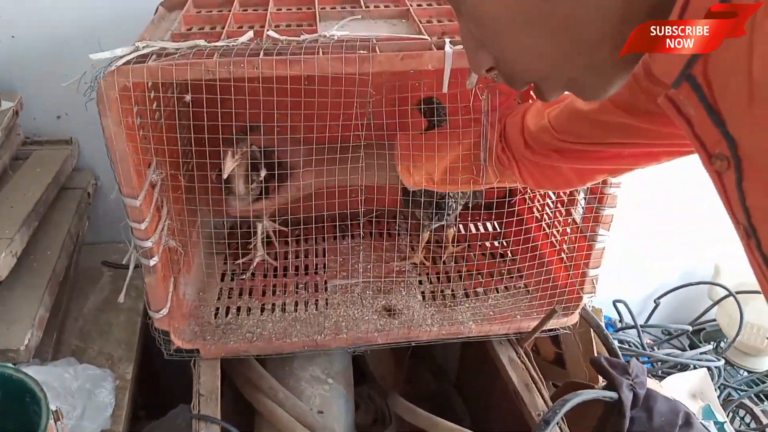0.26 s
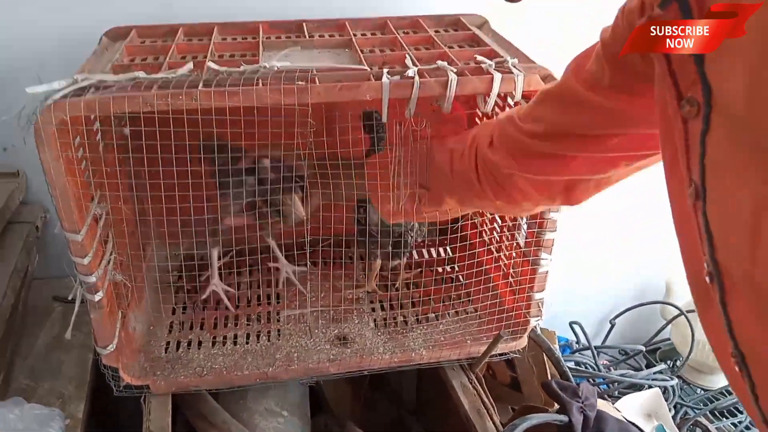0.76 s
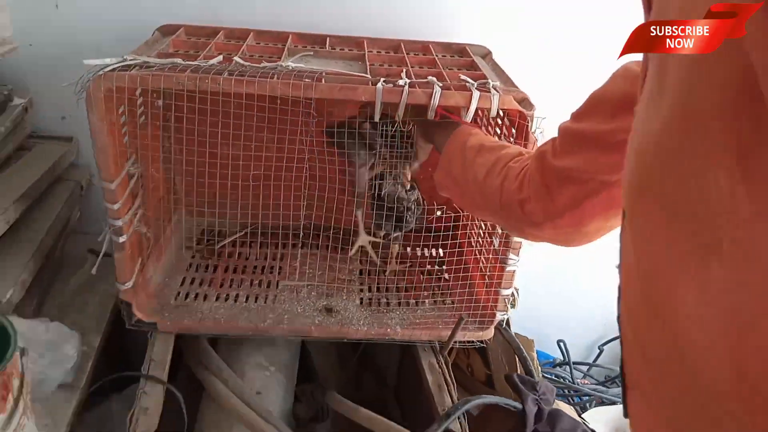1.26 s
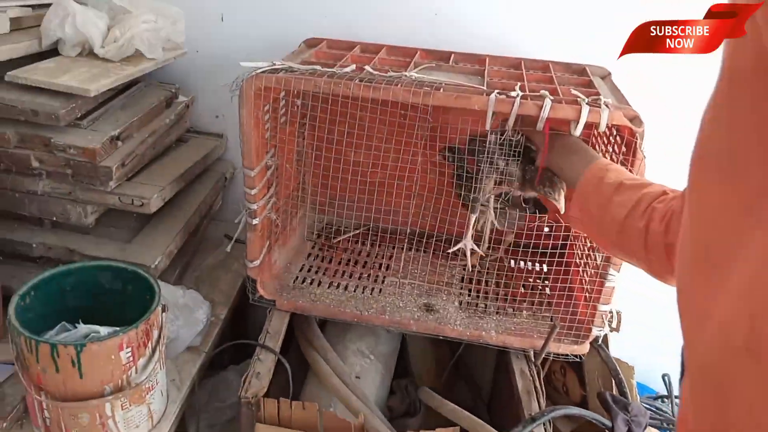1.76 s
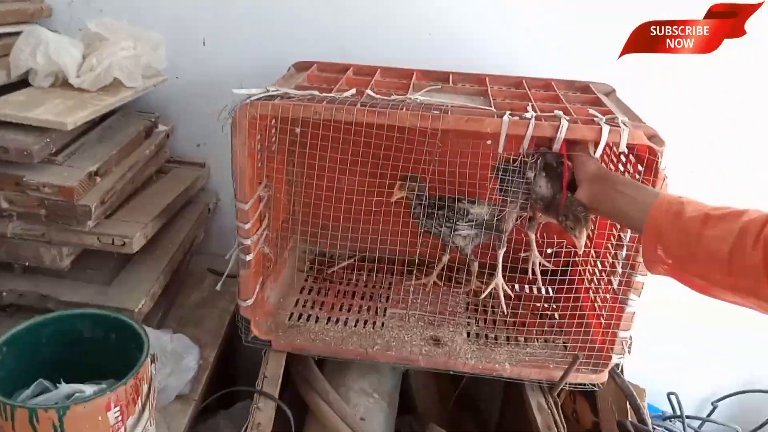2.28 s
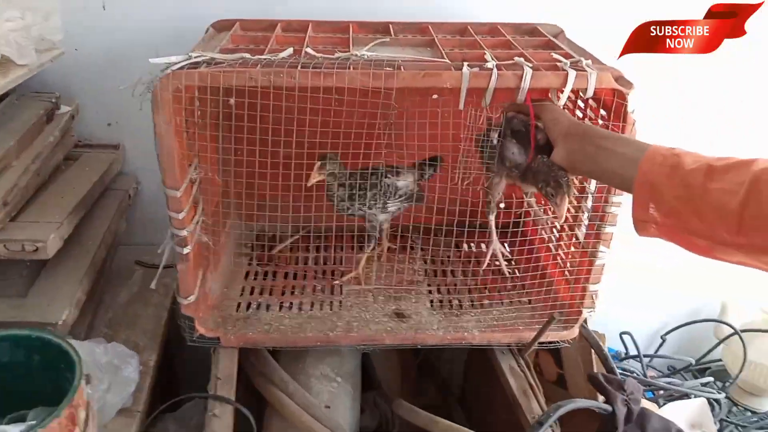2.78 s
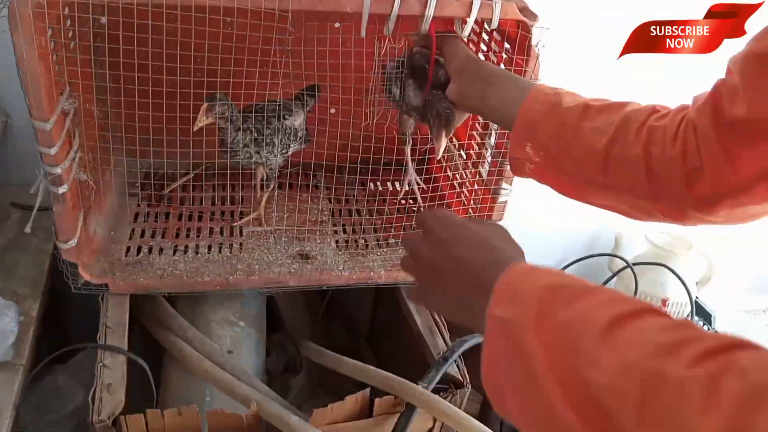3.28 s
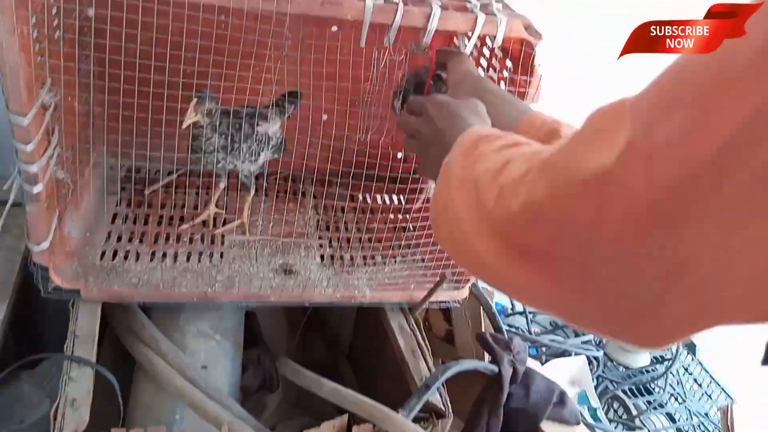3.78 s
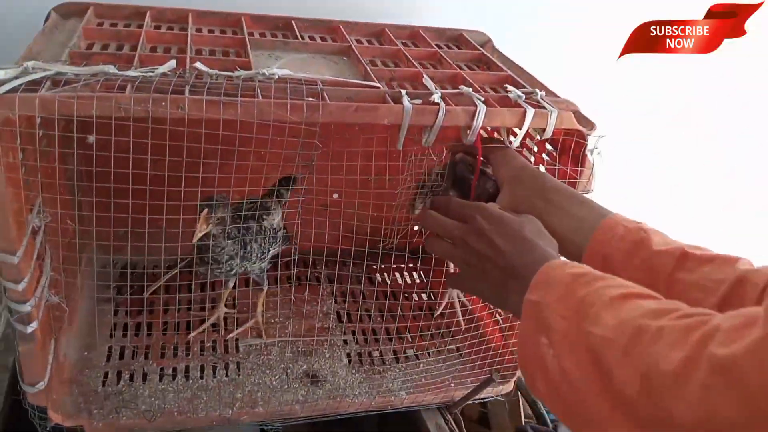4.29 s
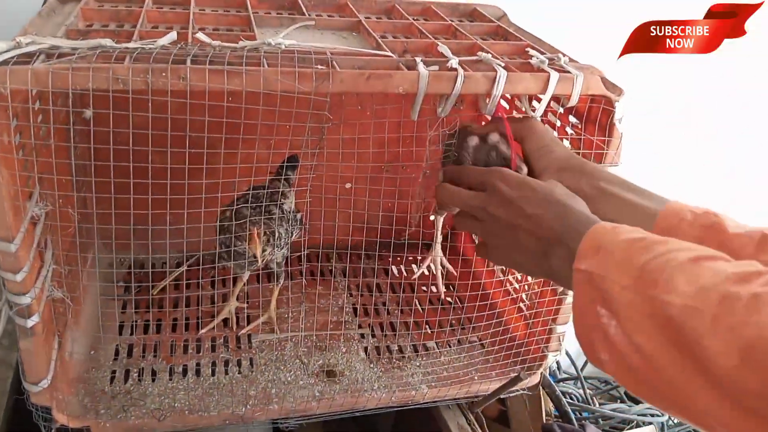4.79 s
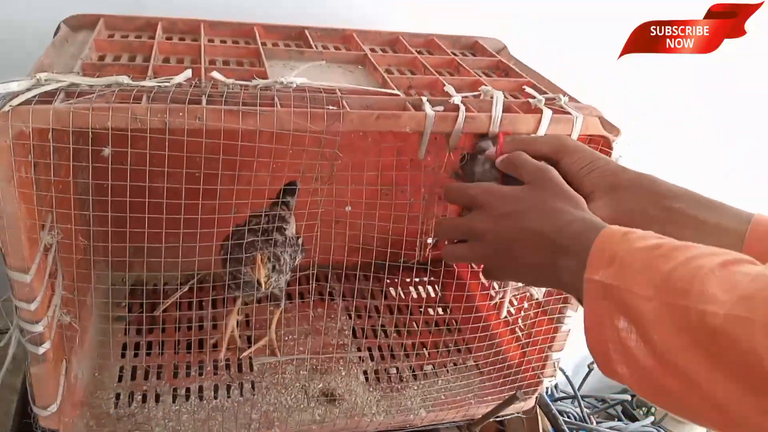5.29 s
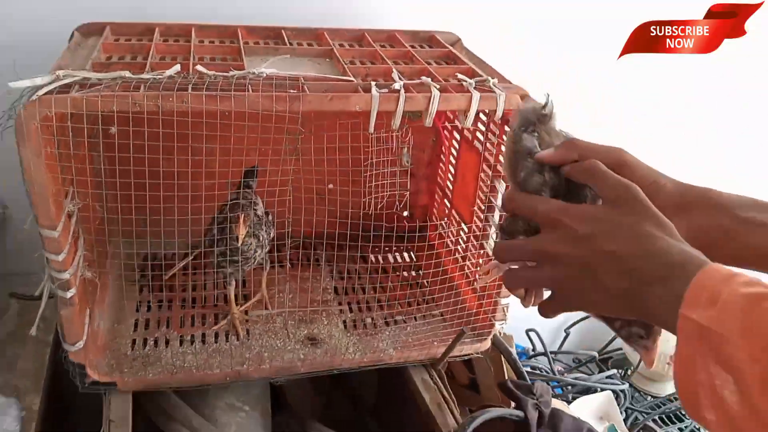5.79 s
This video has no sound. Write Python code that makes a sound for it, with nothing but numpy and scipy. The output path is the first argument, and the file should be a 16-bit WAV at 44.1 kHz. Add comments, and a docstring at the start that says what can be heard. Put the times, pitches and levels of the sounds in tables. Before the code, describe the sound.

Two chicks give soft falling peeps and short alarm chips in a plastic crate, feathers brushing and claws ticking on its wire front. As a hand catches one, it gives two loud cries, then hoarse screeches, then squawks mixed with piercing squeals. The crate is lightly bumped now and then. The sounds are fairly close, in a small hard room with a faint low rumble behind.

```python
"""Short alarm chips and feathers brushing wire: two chicks in a plastic crate with a mesh front.
A hand catches one and pulls it out; it gives loud cries, hoarse screeches, squawks and piercing squeals.
Each loud call starts as a vibration of the syrinx; the throat filters its harmonics and strain roughens it.
Soft peeps fall in between, claws tick on the wire and the crate is bumped.
A small hard room reflects these sounds, and a low rumble lies behind."""
import sys
import numpy as np
from scipy import signal
from scipy.fft import rfft, irfft, next_fast_len
from scipy.io import wavfile
from scipy.ndimage import uniform_filter1d

SR = 44100
rng = np.random.default_rng(int(sys.argv[2]) if len(sys.argv) > 2 else 0)


def dump(signal):
    """Clip the signal to [-1, 1] and save it as 16-bit WAV at the path in sys.argv[1]."""
    limited = np.clip(np.atleast_2d(signal).T, -1, 1)
    pcm = np.round(limited * 32767).astype(np.int16)
    wavfile.write(sys.argv[1], SR, pcm)


N = 266805
TIME = np.arange(N) / SR


def amp(db):
    """Amplitude ratio of a level in decibels."""
    return 10 ** (np.asarray(db) / 20)

def unit(x):
    """Normalisation to rms 1."""
    return x / np.sqrt(np.mean(x ** 2) + 1e-20)

def ramp(x):
    """Saturation at 0 and 1."""
    return np.clip(x, 0, 1)

def swell(peak_s, half_width_s):
    """Gaussian envelope of height 1."""
    return np.exp(-((TIME - peak_s) / half_width_s) ** 2)

def fade(x):
    """A cosine taper keeps both ends from clicking."""
    return x * signal.windows.tukey(len(x), min(1, .006 * SR / len(x)))

def phase_of(hz):
    """Phase is the time integral of frequency."""
    return 2 * np.pi * np.cumsum(hz) / SR

def read(points, hz):
    """Interpolation on a log-frequency axis."""
    frequencies, values = np.transpose(points)
    return np.interp(np.log(np.maximum(hz, 1)), np.log(frequencies), values)

def colour(x, spectrum):
    """Linear filtering: each frequency is scaled by its gain in dB."""
    size = next_fast_len(2 * len(x))
    gain = amp(read(spectrum, np.fft.rfftfreq(size, 1 / SR)))
    return irfft(rfft(x, size) * gain, size)[:len(x)]

def noise(n, spectrum):
    """Filtered white noise of rms 1."""
    return unit(colour(rng.standard_normal(n), spectrum))

def wobble(n, hz):
    """Random modulation: low-pass noise of bandwidth hz and rms near 1."""
    size = next_fast_len(n + SR // 8, real=True)
    lowpass = np.exp(-.5 * (np.fft.rfftfreq(size, 1 / SR) / hz) ** 2)
    return unit(irfft(rfft(rng.standard_normal(size)) * lowpass, size))[:n]

def play(rows, source):
    """Superposition: each row gives a start time, then the arguments of the source."""
    mix = np.zeros(N)
    for start_s, *settings in rows:
        sound = source(*settings)
        part = mix[round(start_s * SR):][:len(sound)]
        part += sound[:len(part)]
    return mix


# spectrum of the far rumble: frequency_hz, gain_db
RUMBLE_SPECTRUM = [(15, -57), (25, -32.5), (132, -2.5), (168, -3), (242, -11.5), (356, -15.5), (590, -18),
                   (751, -16.5), (848, -22), (1160, -22.5), (1630, -20.5), (2640, -31), (5180, -52.5),
                   (6600, -29.5), (8000, -71), (10400, -95.5), (17600, -120)]
# far hums: peak_s, half_width_s, pitch_hz, level_db
HUMS = [(0.2, 0.11, 147, -55), (0.384, 0.15, 308.3, -54), (0.915, 0.18, 289.5, -52),
        (1.374, 0.25, 151, -43), (2.087, 0.035, 150, -42.5), (2.723, 0.1, 152.6, -43),
        (3.145, 0.18, 159.8, -48), (4.1, 0.56, 181, -56.5), (3.099, 0.35, 295.6, -56),
        (5.447, 0.35, 132, -47)]

def background(rumble_db=-48, waver=.013, flutter_db=2):
    """Slow modulation: low noise drifts in level while wavering hums swell and fade in it."""
    rumble = noise(N, RUMBLE_SPECTRUM) * amp(rumble_db + 1.2 * wobble(N, 6))
    phase_per_hz = phase_of(1 + waver * wobble(N, 16.6))
    hums = sum(amp(db) * swell(s, width) * unit(np.sin(hz * phase_per_hz)) for s, width, hz, db in HUMS)
    return rumble + hums * unit(amp(flutter_db * wobble(N, 23)))


# reverberation time of the room: frequency_hz, t60_s
ROOM_DECAY = [(200, 0.53), (1000, 0.43), (2600, 0.45), (7000, 0.37)]
# early reflections from crate and wall: delay_s, gain_ratio
ECHOES = [(.0013, 1.0), (.0031, 0.23), (.0074, 0.15), (0.0115, 0.11)]

def room(x, scatter_decay_s=.027, tail_db=-9):
    """Convolution with early reflections, quick scatter from crate and clutter, and a reverberant tail."""
    t = np.arange(SR // 2) / SR
    signs = rng.choice([-1., 1.], (2, len(t)))
    scatter_taps, tail_taps = signs * (rng.random((2, len(t))) < .1) * (t > .003)
    scatter = scatter_taps * np.exp(-t / scatter_decay_s)
    hz, age, bands = signal.stft(tail_taps, SR, nperseg=256)
    bands = bands * amp(-60 * age / read(ROOM_DECAY, hz)[:, None])
    tail = signal.istft(bands, SR, nperseg=256)[1][:len(t)]
    response = scatter / np.linalg.norm(scatter) + amp(tail_db) * tail / np.linalg.norm(tail)
    for delay_s, gain in ECHOES:
        response[round(delay_s * SR)] += gain
    return signal.fftconvolve(x, response / np.linalg.norm(response))[:N]


def impact(db, spectrum, decay_s):
    """Damped vibration: a blow excites a dense rattle in the colour of what is struck."""
    t = np.arange(SR // 5) / SR
    return amp(db) * noise(len(t), spectrum) * np.exp(-t / decay_s)


# response of the plastic crate: frequency_hz, gain_db
CRATE_SPECTRUM = [(80, -26.5), (170, -10.5), (330, 3), (600, 2), (900, -1.5), (1500, -6), (3000, -28.5),
                  (8000, -49)]
# bumps on the crate: start_s, level_db
BUMPS = [(.85, -42.5), (1.775, -47), (1.792, -42), (1.85, -44), (2.195, -46), (2.53, -38.5), (3.17, -42),
         (4.01, -44), (4.075, -44), (5.03, -43.5), (5.322, -35), (5.42, -37.5)]

def crate_bump(db):
    """Impact excitation: the plastic answers with a low thud."""
    return impact(db, CRATE_SPECTRUM, decay_s=.027)


# spectrum of contact with the wire: frequency_hz, gain_db
MESH_SPECTRUM = [(300, -19), (1200, -5.5), (2200, -4), (3500, -1), (5000, -7), (6500, -1.5), (7400, -13.5),
                 (8500, -9.5)]
# feather strokes: peak_s, half_width_s, level_db
STROKES = [(-0.003, 0.075, -37.5), (0.334, 0.14, -48.5), (0.735, 0.21, -49.5), (1.305, 0.23, -55),
           (4.099, 0.48, -49.5), (5.625, 0.1, -39.5)]
# claws and fingers on the wire: start_s, level_db
TICKS = [(.102, -38), (.4, -37.5), (.44, -30), (.595, -35.5), (.99, -40), (1.04, -34.5), (1.10, -43),
         (1.165, -41), (1.36, -37), (1.39, -39), (1.615, -49), (5.087, -49.5), (5.22, -31), (5.55, -29),
         (5.568, -37), (5.595, -42)]

def wire_mesh(shuffle_db=-56.5, clump_db=3.5, grain_db=3):
    """Friction and impact: ever-shuffling feathers scrape in clumps of grains; claws and fingers tick."""
    scrape = rng.standard_normal(N) * amp(clump_db * wobble(N, 21) + grain_db * wobble(N, 500))
    pressure = amp(shuffle_db) + sum(amp(db) * swell(s, width) for s, width, db in STROKES)
    ticks = play(TICKS, lambda db: impact(db, MESH_SPECTRUM, decay_s=.017))
    return unit(colour(scrape, MESH_SPECTRUM)) * pressure + ticks


# soft falling peeps: start_s, length_s, start_hz, end_hz, level_db
SOFT_PEEPS = [ (0.206, .17, 5374, 3416, -39), (0.519, 0.08, 3060, 2150, -40),
              (0.781, 0.098, 5090, 4490, -41), (0.843, 0.092, 4516, 2870, -43),
              (1.276, .18, 5090, 3112, -41), (1.466, 0.091, 3685, 2970, -46.5),
              (2.418, .082, 4190, 2785, -38.5), (3.201, .1, 4200, 3470, -40),
              (5.686, 0.17, 5110, 2727, -37.5)]

def soft_peep(length_s, start_hz, end_hz, db, twin_ratio=1.13, twin_db=-4, twin_s=.067):
    """Biphonation: a thin, unsteady whistle slides down, with a higher second voice at its start."""
    progress = np.linspace(0, 1, int(length_s * SR))
    n = len(progress)
    glide_hz = start_hz + (end_hz - start_hz) * progress ** .89
    phase = phase_of(glide_hz * (1 + .014 * wobble(n, 250)))
    twin = amp(twin_db) * np.exp(-(progress * length_s / twin_s) ** 2) * np.sin(twin_ratio * phase)
    flutter = unit(amp(4 * wobble(n, 90)))
    return amp(db) * (np.sin(phase) + twin) * flutter * signal.windows.tukey(n, .5)


# alarm chips: start_s, length_s, start_hz, end_hz, level_db, harmonic_step_db
CHIPS = [ (0.0, 0.021, 3334, 3095, -27, -21), (0.091, 0.035, 2140, 1786, -40, -17),
         (0.248, 0.032, 2980, 1397, -29, -4), (.441, 0.022, 3205, 1200, -28.5, -5.5),
         (0.453, 0.019, 2600, 2027, -26.5, -19), (0.616, 0.033, 3480, 1856, -28, -6),
         (0.796, .033, 3300, 1998, -32, -5.5), (0.981, 0.021, 2630, 2414, -36, 0.5),
         (1.009, 0.051, 3580, 3006, -34.5, -28), (1.396, .023, 2098, 1758, -29, -10),
         (3.592, .019, 2340, 1696, -22.5, -22), (4.678, 0.048, 3060, 2886, -29, -26.5),
         (4.704, .04, 2370, 1655, -27, -8), (4.979, 0.016, 2630, 1610, -22, -5.5),
         (5.159, 0.012, 4210, 1523, -17.5, -3), (5.17, 0.027, 2860, 2056, -17, -17),
         (5.24, 0.023, 2320, 1830, -27, -11), (5.415, 0.0247, 2764, 1872, -16.5, -10.5),
         (5.611, 0.024, 3225, 1788, -21.5, -15)]

def chip(length_s, start_hz, end_hz, db, step_db, jitter=.054, flutter_db=3, rasp=.28):
    """Frequency sweep: a shaky, raspy note plunges and levels out as it swells and stops."""
    progress = np.linspace(0, 1, int(length_s * SR))
    n = len(progress)
    glide_hz = end_hz + (start_hz - end_hz) * (1 - progress) ** 2.4
    hz = glide_hz * (1 + jitter * wobble(n, 400))
    phase = phase_of(hz)
    tone = sum(amp(step_db * (k - 1)) * np.sin(k * phase) / (1 + (k * hz / 6800) ** 12)
               for k in range(1, 5))
    tone += rasp * wobble(n, 700) * np.sin(1.5 * phase)  # noise between the first two harmonics
    envelope = np.sin(np.pi * progress ** .96)
    return amp(db) * unit(tone * envelope * amp(flutter_db * wobble(n, 410)))


def voice(hz, db, rough, throat, jitter, jitter_hz, flutter_db, rasp, doubling=0):
    """Source and filter: the syrinx buzzes through the throat; strain shakes the tone and adds rasp."""
    n, rough = len(hz), ramp(rough)
    phase = phase_of(hz * (1 + jitter * rough * wobble(n, jitter_hz)))
    buzz = sum(np.cos(k * phase) * (k * hz < SR / 4) for k in range(1, 10))
    buzz *= 1 + doubling * rough * np.cos(phase / 2)  # strong and weak cycles alternate
    buzz *= amp(flutter_db * rough * np.minimum(wobble(n, 350), 1.4))
    hiss = rng.standard_normal(n) * (1 + .31 * np.cos(phase)) * amp(1.1 * wobble(n, 200))
    sound = unit(colour(buzz, throat)) + rasp * rough ** 2 * unit(colour(hiss, throat))
    running_rms = np.sqrt(uniform_filter1d(sound ** 2, size=1100) + 1e-9)
    return fade(amp(db) * sound / running_rms)

def whistle(hz, db, rough, jitter, jitter_hz, flutter_db):
    """Jitter and shimmer: roughness shakes the pitch and amplitude of a single tone."""
    phase = phase_of(hz * (1 + jitter * rough * wobble(len(db), jitter_hz)))
    flutter = amp(flutter_db * rough * wobble(len(db), 400))
    return fade(amp(db) * unit(np.sin(phase) * flutter))

def arch(length_s, top_hz, scoop, rise_s, sag_hz_per_s, drop_s, end_hz, db, swell_db,
         fade_db, rough_start, rough_mid, rough_end, attack_s=.022, clearing_s=.03):
    """Breath contour: a call scoops up, sags as it swells and clears, then drops as the air runs out."""
    t = np.arange(0, length_s, 1 / SR)
    falling = ramp((t - length_s + drop_s) / drop_s) ** 1.6
    held_hz = top_hz * (1 - scoop * ramp(1 - t / rise_s) ** 2) - sag_hz_per_s * np.maximum(t - rise_s, 0)
    level_db = db - swell_db * ramp(1 - t / (length_s - drop_s))
    level_db += fade_db * falling - 13 * ramp(1 - t / attack_s)
    rough = rough_mid + rough_start * np.exp(-t / clearing_s) + rough_end * falling
    return held_hz + (end_hz - held_hz) * falling, level_db, rough

REST_HZ = 1282  # pitch on which a strained call settles

def strain(length_s, top_hz, settle_s, db, attack_s, sag_db_per_s, release_s, rough_rest, rough_top):
    """Relaxation: as tension eases, pitch and roughness settle towards their resting values."""
    t = np.arange(0, length_s, 1 / SR)
    onset, age = ramp(1 - t / attack_s), np.maximum(t - attack_s, 0)
    release = ramp((t - length_s + release_s) / release_s)
    tension = np.exp(-(age / settle_s) ** 2)
    hz = np.maximum(REST_HZ + (top_hz - REST_HZ) * tension - .18 * top_hz * onset, REST_HZ)
    level_db = db - 26 * onset - sag_db_per_s * age - 18 * release
    return hz, level_db, rough_rest + (rough_top - rough_rest) * tension


# throat response in a whimper: frequency_hz, gain_db
WHIMPER_TRACT = [(900, -2.5), (1750, -2.5), (2600, -3), (3600, 6), (5300, -6), (6700, -15.5), (8500, -43.5)]
# weak whimpers: start_s, length_s, top_hz, settle_s, level_db, attack_s, sag_db_per_s, release_s
WHIMPERS = [(2.857, .17, 1838, .06, -35.5, .018, 42, .04)]

def whimper(*shape):
    """Aperiodic voicing: a weak call grows hoarser as its pitch sinks."""
    contour = strain(*shape, rough_rest=.574, rough_top=.272)
    return voice(*contour, WHIMPER_TRACT, jitter=.232, jitter_hz=302, flutter_db=8.5, rasp=1.4)


# throat response with the beak wide open: frequency_hz, gain_db
SQUAWK_TRACT = [(700, -14), (1500, -9.5), (2200, -1), (2900, 2.5), (4500, 0), (5200, 0), (6200, 5),
                (7200, -14), (7800, -26), (8500, -19.5)]
# squawks: start_s, length_s, top_hz, scoop_ratio, rise_s, sag_hz_per_s, drop_s, end_hz, level_db, swell_db
SQUAWKS = [(4.855, 0.19, 1705, .12, .05, 3590, .056, 707, -16, 14.5),
           (5.26, .187, 1434, .05, 0.0199, 702, .075, 593.5, -21.5, 3)]

def squawk(*shape):
    """Period doubling: the strained syrinx adds tones between its harmonics."""
    contour = arch(*shape, fade_db=-14, rough_start=.51, rough_mid=.086, rough_end=.04)
    return voice(*contour, SQUAWK_TRACT, jitter=.11, jitter_hz=251, flutter_db=17, rasp=.62, doubling=.81)


# throat response in a screech: frequency_hz, gain_db
SCREECH_TRACT = [(500, -31), (950, -11), (1280, -12), (1850, -12.5), (2550, 2.5), (3200, -1.5), (3900, 3),
                 (4950, -5), (5900, 2), (6700, -0.5), (7400, -15.5), (8500, -23.5)]
# screeches: start_s, length_s, top_hz, settle_s, level_db, attack_s, sag_db_per_s, release_s, low_tone_db
SCREECHES = [(2.973, 0.29, 1328, 0.17, -29, .13, 60.5, 0.016, -37),
             (3.226, .14, 1345, 0.13, -31, 0.039, 43, .05, -44),
             (3.531, 0.35, 1676, .165, -18, .056, 40, 0.077, -34),
             (4.089, .587, 1792, .145, -19, .056, 11.5, 0.04, -42)]

def screech(*row, beak_hz=4550, beak_half_width_hz=250, beak_db=-5):
    """Resonance: the third harmonic of a torn buzz rings in the beak, over a steadier low tone."""
    *shape, low_db = row
    hz, db, rough = strain(*shape, rough_rest=.675, rough_top=.8)
    hz = hz * (1 + .0117 * wobble(len(hz), 23.8))
    buzz = voice(hz, db, rough, SCREECH_TRACT, jitter=.12, jitter_hz=297, flutter_db=8,
                 rasp=.46, doubling=.4)
    resonance = amp(beak_db) / np.hypot(1, (3 * hz - beak_hz) / beak_half_width_hz)
    third = resonance * whistle(3 * hz, db, rough, jitter=.0612, jitter_hz=239, flutter_db=6)
    low_hz = 1247 + .079 * (hz - REST_HZ)  # the other side of the syrinx, pulled up a little by strain
    low_tone = whistle(low_hz, db - db.max() + low_db, rough, jitter=.05, jitter_hz=200, flutter_db=4.5)
    return buzz + third + low_tone


# throat response in a clear cry: frequency_hz, gain_db
CRY_TRACT = [(900, -9.5), (1500, -19), (2300, -10), (3200, 1.5), (4300, -1), (5100, -5.5), (5700, -12),
             (6500, -4.5), (7200, -16.5), (7800, -27), (8500, -24)]
# cries: start_s, length_s, top_hz, scoop_ratio, rise_s, sag_hz_per_s, drop_s, end_hz, level_db, swell_db
CRIES = [(1.852, .153, 2581, .33, .064, 8100, .027, 1340, -10, 17.5),
         (2.228, .162, 2203, 0.13, 0.0451, 1747, .05, 1205, -17, 7.5)]

def cry(*shape):
    """Nearly periodic vibration: a loud harmonic call, clear in the middle and rough at both ends."""
    contour = arch(*shape, fade_db=-7.5, rough_start=.45, rough_mid=.041, rough_end=.45)
    return voice(*contour, CRY_TRACT, jitter=.169, jitter_hz=221, flutter_db=5, rasp=.45)


# piercing squeals: start_s, length_s, top_hz, leap_s, level_db, hold_s, fade_db_per_s
SQUEALS = [(3.055, .1, 5935, .011, -11, .004, 277), (5.082, .115, 6033, .011, -10, 0.034, 295),
           (5.214, .13, 5950, .016, -6.5, 0.0035, 176.5)]

def squeal(length_s, top_hz, leap_s, db, hold_s, fade_db_per_s, attack_s=.015, clearing_s=.019):
    """Transition from noise to tone: a whistle leaps up out of a burst of rasp and dies away clean."""
    t = np.arange(0, length_s, 1 / SR)
    hz = top_hz * (1 - .32 * np.exp(-t / leap_s))
    level_db = db - 24 * ramp(1 - t / attack_s) - fade_db_per_s * np.maximum(t - attack_s - hold_s, 0)
    rough = .074 + np.exp(-t / clearing_s)
    rasp = noise(len(t), SQUAWK_TRACT) * amp(level_db - 7) * rough
    return whistle(hz, level_db, rough, jitter=.17, jitter_hz=660, flutter_db=5) + fade(rasp)


def scene():
    """Superposition: birds and handling reverberate in the room, over the background."""
    calls = play(CRIES, cry) + play(SQUAWKS, squawk) + play(WHIMPERS, whimper)
    calls += play(SCREECHES, screech) + play(SQUEALS, squeal)
    calls += play(CHIPS, chip) + play(SOFT_PEEPS, soft_peep)
    handling = wire_mesh() + play(BUMPS, crate_bump)
    return (room(calls + handling) + background())[None]

def limiter(x, threshold_db=-20, slope=.36, recovery_db_per_s=90):
    """Dynamic compression: the gain falls on the loudest calls and recovers quickly."""
    power_db = 10 * np.log10(abs(uniform_filter1d(x ** 2, size=300)) + 1e-12)
    recovery_db = TIME * recovery_db_per_s
    held_db = np.maximum.accumulate(power_db + recovery_db) - recovery_db
    excess_db = np.maximum(held_db - threshold_db, 0)
    return x * amp(-slope * uniform_filter1d(excess_db, size=150))

def record(dry, cutoff_hz=8200):
    """Band limiting: the microphone rolls off above 7.4 kHz; a limiter and a steep low-pass follow."""
    dulled = colour(dry[0], [(6800, .5), (7400, 1.5), (8000, -13), (8500, -13)])
    lowpass = signal.firwin(255, cutoff_hz, window=("kaiser", 8), fs=SR)
    return signal.oaconvolve(limiter(dulled), lowpass, "same")[None]


dry = scene()
out = record(dry)
dump(out)
```